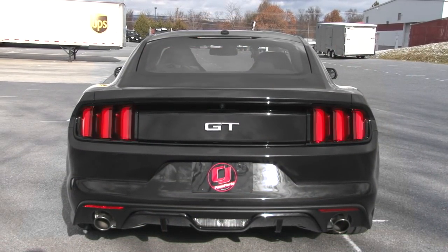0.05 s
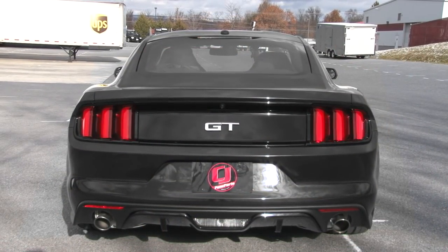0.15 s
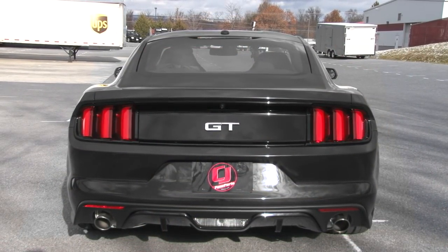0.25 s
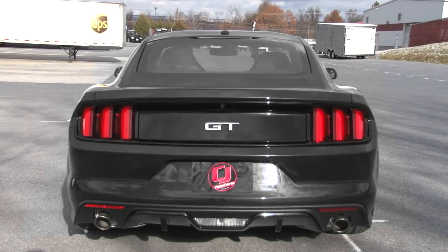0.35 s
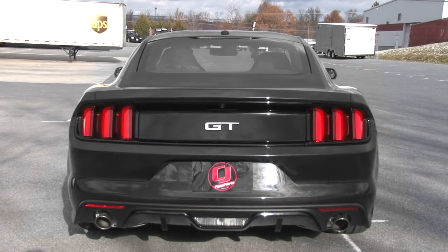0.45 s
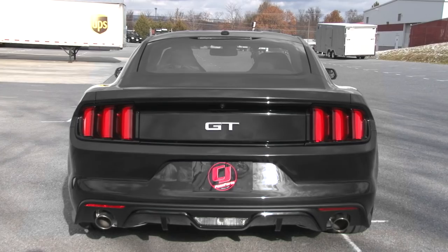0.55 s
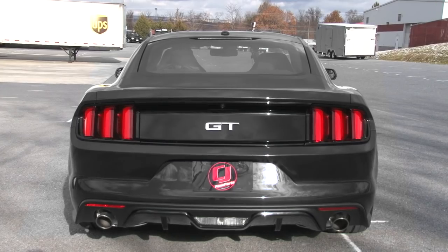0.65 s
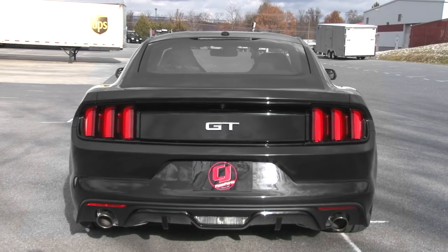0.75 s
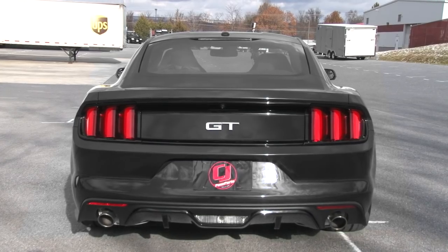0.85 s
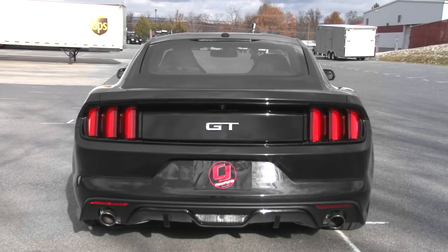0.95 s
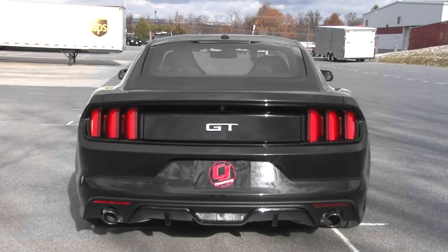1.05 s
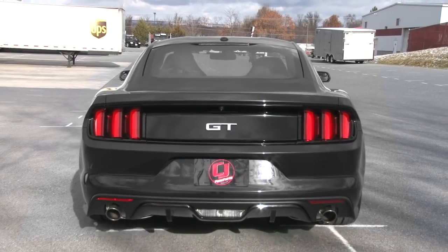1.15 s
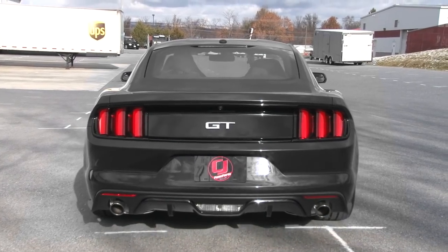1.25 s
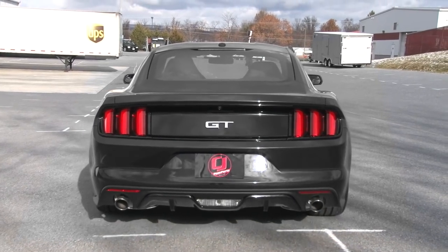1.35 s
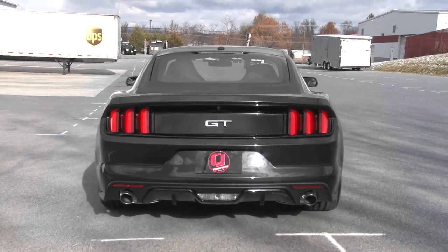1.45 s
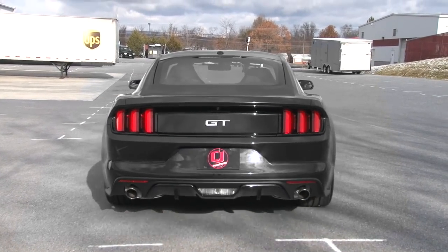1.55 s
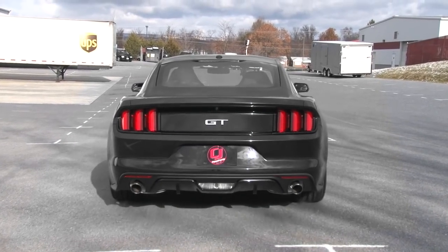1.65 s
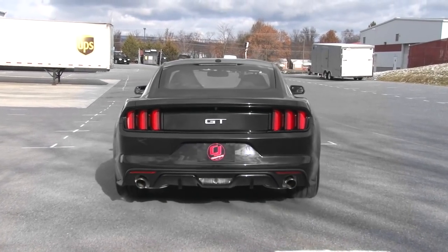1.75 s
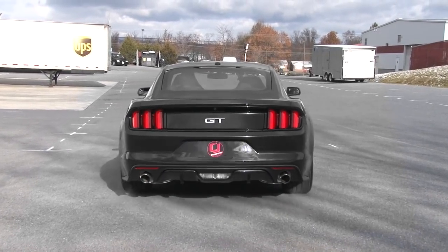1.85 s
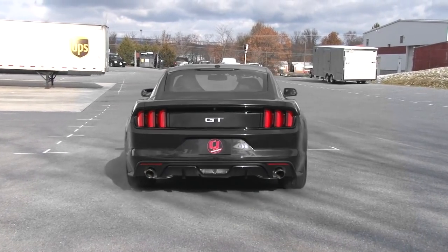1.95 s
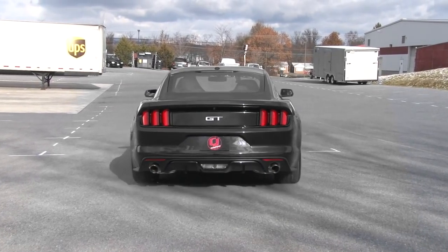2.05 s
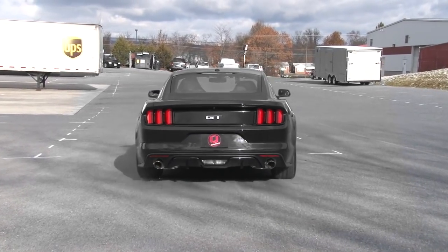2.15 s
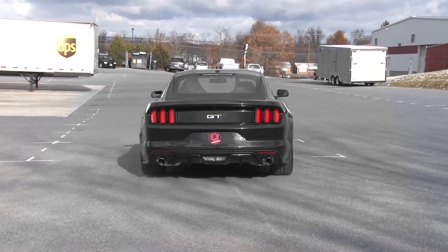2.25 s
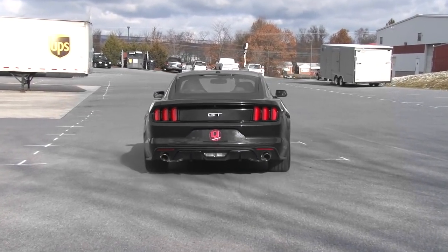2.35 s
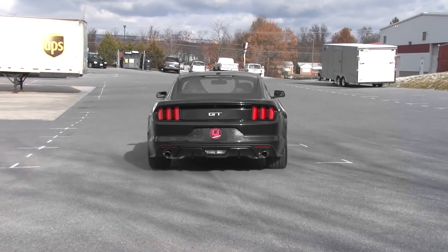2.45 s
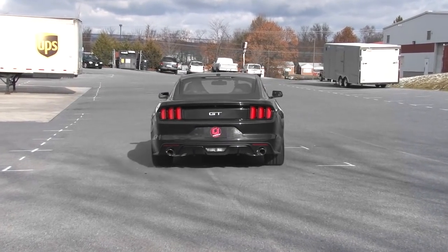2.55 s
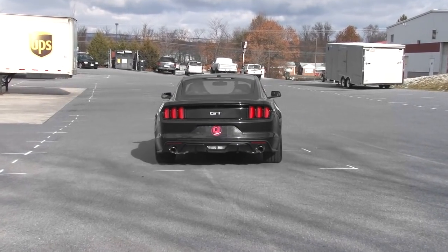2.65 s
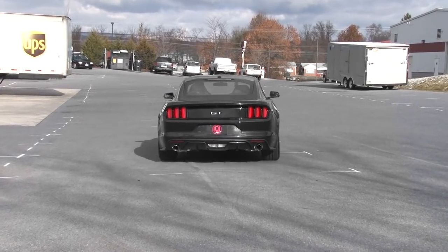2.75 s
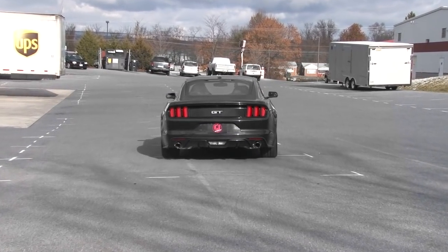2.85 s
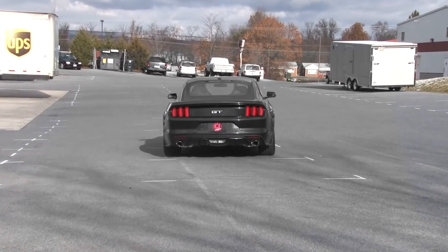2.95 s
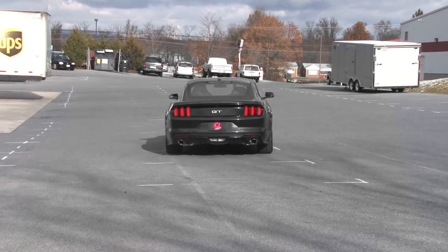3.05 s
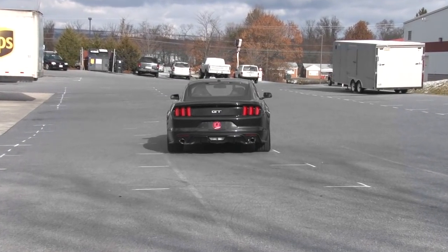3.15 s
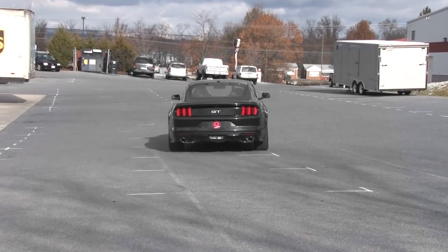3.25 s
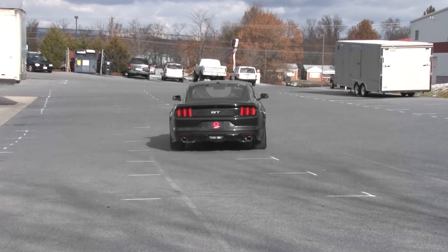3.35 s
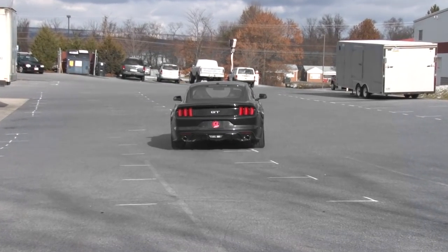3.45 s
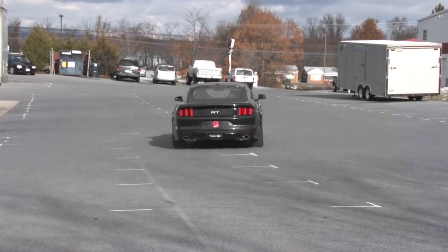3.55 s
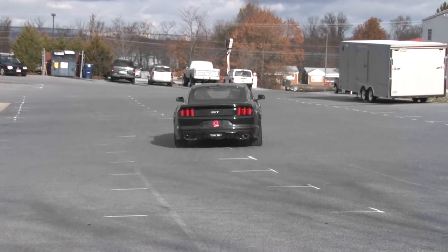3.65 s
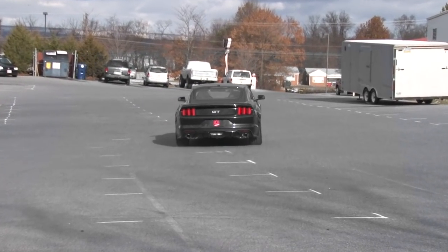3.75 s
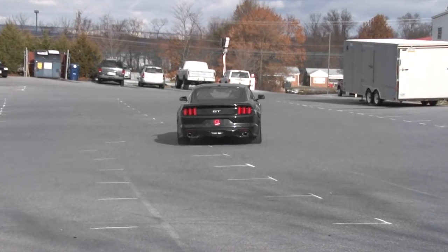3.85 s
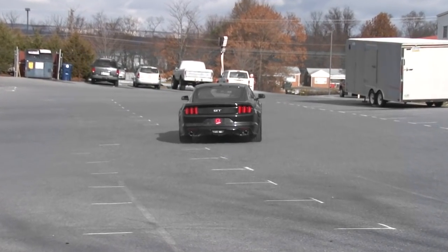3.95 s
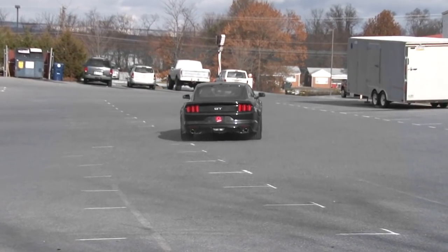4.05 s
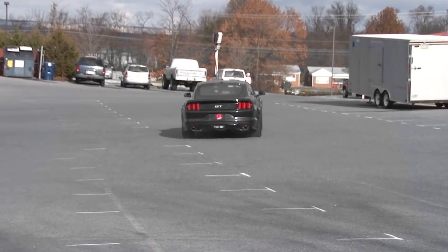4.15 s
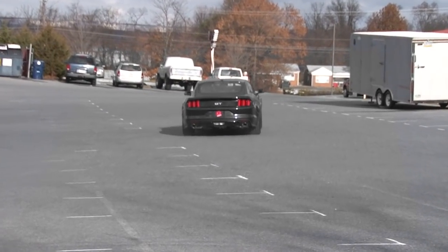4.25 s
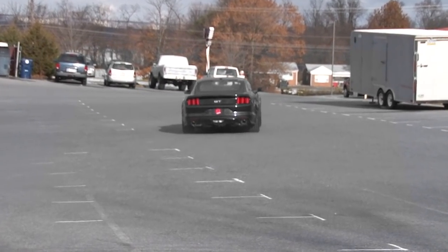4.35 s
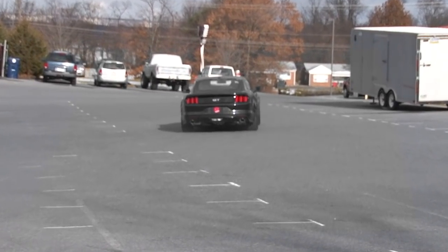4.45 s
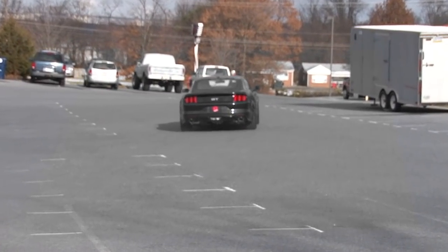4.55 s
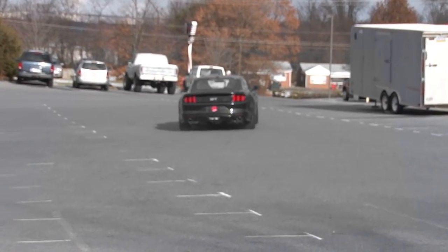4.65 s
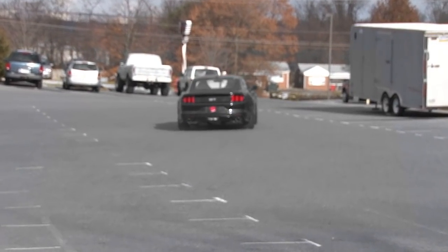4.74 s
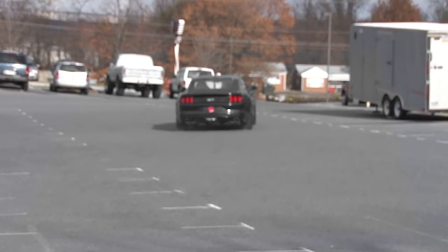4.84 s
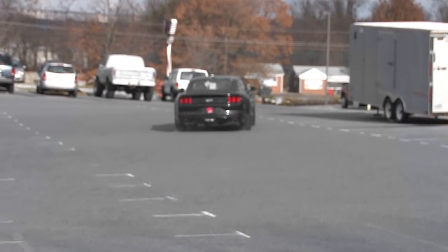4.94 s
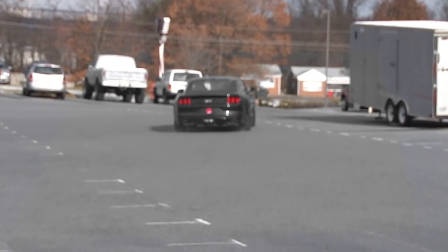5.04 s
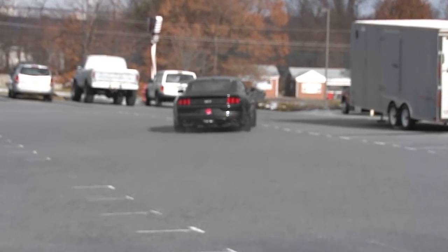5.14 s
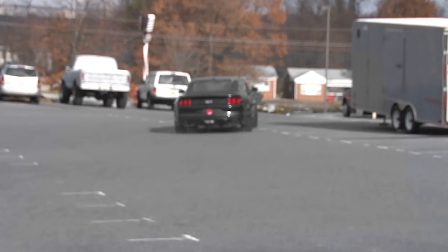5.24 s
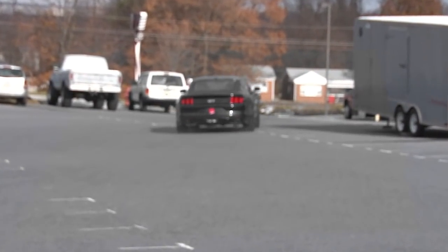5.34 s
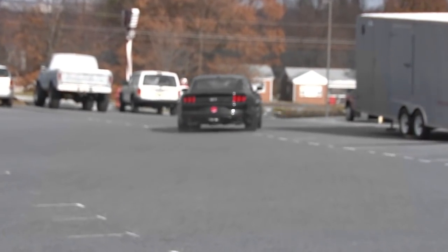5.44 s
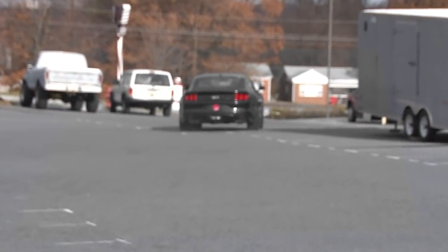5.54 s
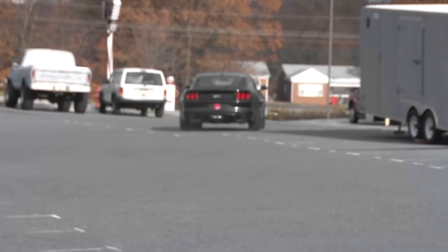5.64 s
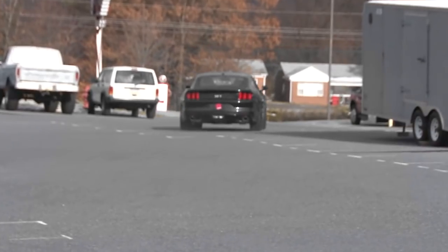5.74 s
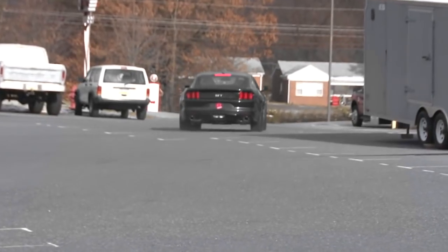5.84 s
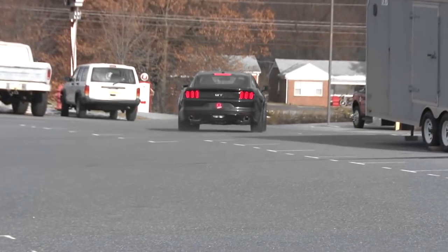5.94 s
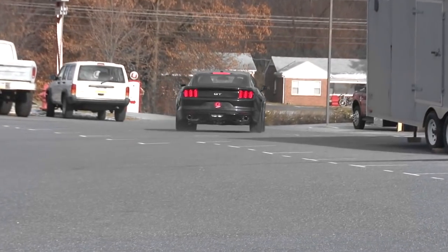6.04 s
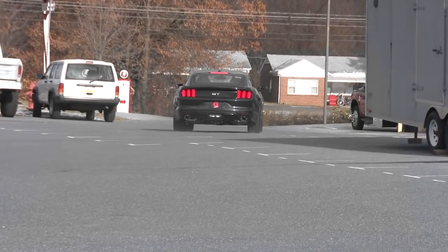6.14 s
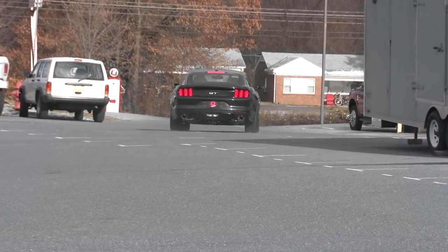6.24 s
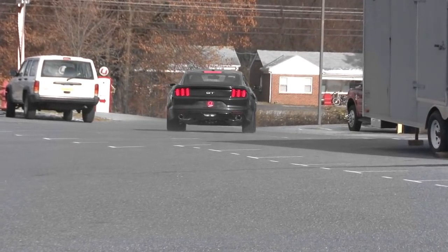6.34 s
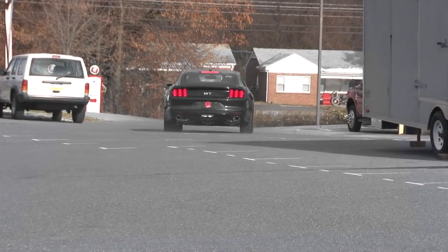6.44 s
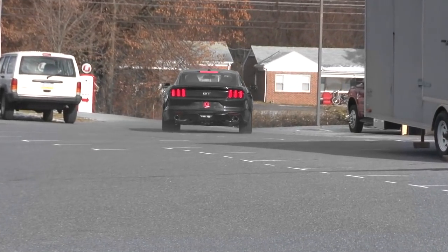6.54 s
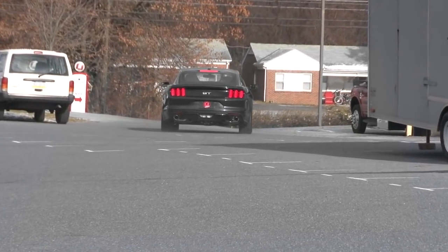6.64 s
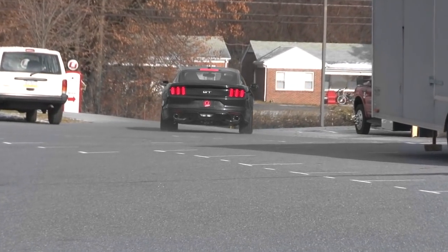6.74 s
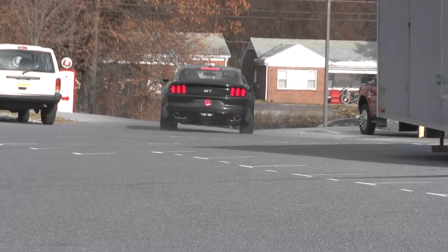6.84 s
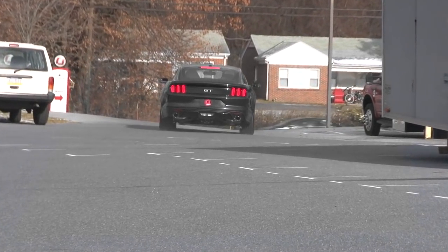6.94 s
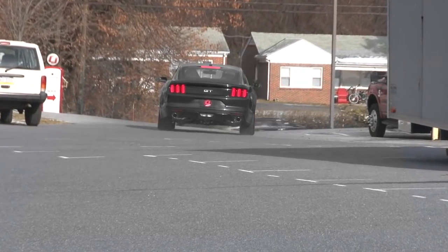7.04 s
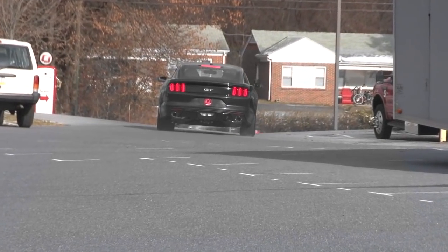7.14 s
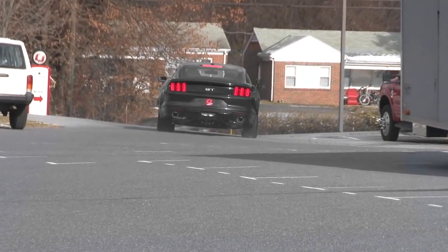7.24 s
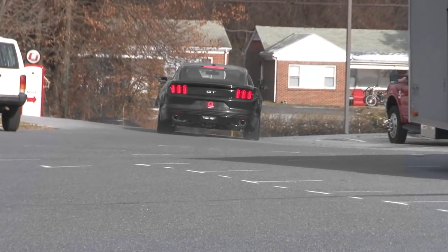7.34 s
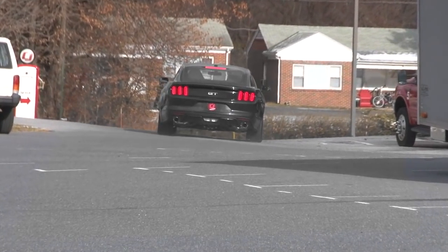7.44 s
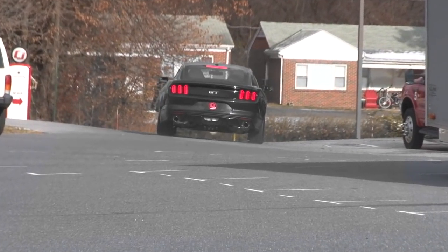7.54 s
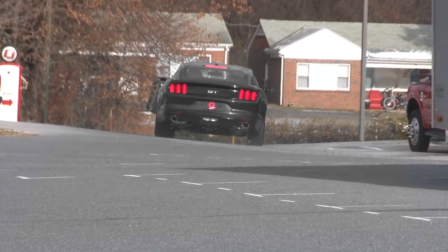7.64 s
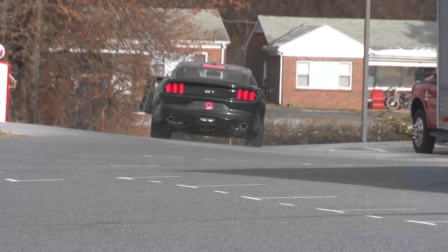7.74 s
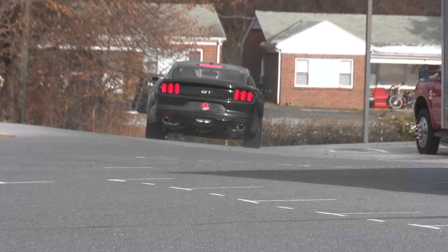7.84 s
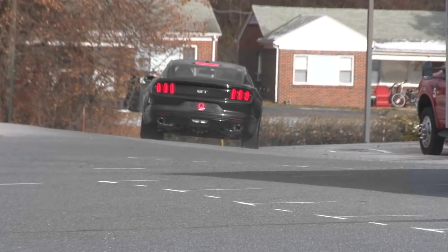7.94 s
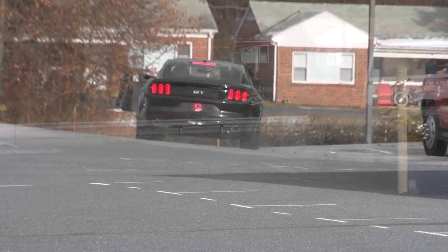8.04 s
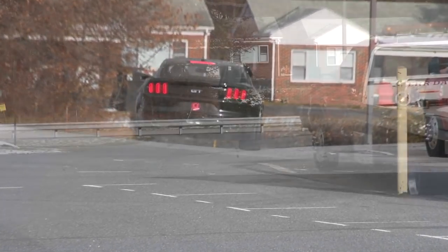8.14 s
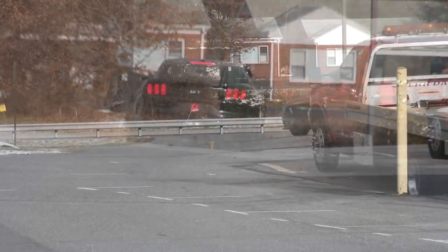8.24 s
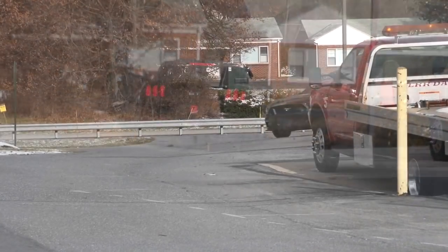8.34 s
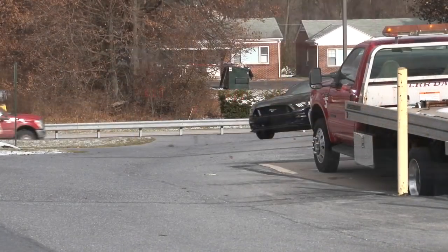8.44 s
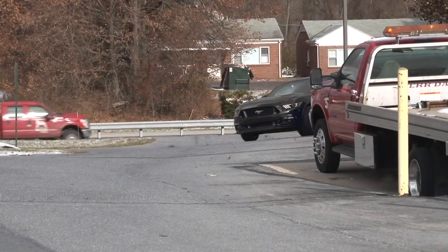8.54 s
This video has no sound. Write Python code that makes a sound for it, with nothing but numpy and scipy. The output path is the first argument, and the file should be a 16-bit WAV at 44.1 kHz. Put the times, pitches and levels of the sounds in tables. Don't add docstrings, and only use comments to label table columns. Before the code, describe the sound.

A V8 car burbles and pops, revs hard and launches with chirping tyres, roars through a gear change with another chirp, then fades off over paving.

```python
import sys
import numpy as np
from scipy import signal
from scipy.io import wavfile

SR = 44100
rng = np.random.default_rng(int(sys.argv[2]) if len(sys.argv) > 2 else 0)


def volts_from_db(level):
    exponent = np.asarray(level, float) / 20
    return 10 ** exponent


def wav_record(signal):
    frames = np.transpose(np.atleast_2d(signal))
    bounded = np.clip(frames, -1, 1)
    quanta = np.round(bounded * 32767).astype(np.int16)
    wavfile.write(sys.argv[1], SR, quanta)


N = 378798
T = np.arange(N) / SR

# (frequency [Hz], density [dB per Hz])
WIND_COLOUR = [(20, -5), (35, -8), (55, -2), (80, -6.5), (130, -19), (300, -19.5)]
# (time [s], peak [dB], half length [s])
WIND_GUSTS = [(0.0, -30.5, 0.19), (0.586, -25.5, 0.061), (1.965, -28, 0.02), (2.893, -48, 0.17),
              (3.664, -42, 0.14), (4.572, -46, .12), (5.55, -43, 0.25), (5.997, -41, 0.068),
              (6.604, -41.5, 0.42), (7.143, -42, 0.067), (7.333, -39, 0.18), (7.85, -36, 0.25),
              (8.223, -36.5, 0.16)]
BREEZE_DB = -46.5

# (frequency [Hz], density [dB per Hz])
ROAR_COLOUR = [(53, -47), (90, -6.5), (165, -2), (213, -3.5), (350, -6), (374, -1), (495, -4.5),
               (655, -2.5), (905, -9), (1080, -7.5), (1880, -21.5), (5660, -44.5), (15600, -164)]
# (time [s], roar level [dB])
ROAR_LEVEL = [(.7, -45.5), (1.0, -36), (2.1, -36), (2.6, -34.5), (3.7, -29), (5.3, -27.5), (6.2, -30),
              (6.8, -34), (7.3, -33), (8.15, -34.5), (8.59, -44)]
# (frequency [Hz], width [Hz], level [dB])
GROOVE_MODES = [(890, 120, -5), (1700, 600, -12)]
HUM_S, HUM_HALF_S, HUM_DB = 7.3, .5, 6

# (frequency [Hz], level [dB rms])
LATE_ENGINE = [(93, -64), (115.5, -35), (138.5, -35), (184, -35.5), (229.5, -37.5), (298, -35.5)]

# (time [s], peak [dB])
GRAVEL_CRUNCHES = [(5.2, -56), (5.697, -55), (6.05, -56), (6.32, -56), (6.51, -58), (7.232, -60.5),
                   (7.51, -65), (7.6, -63), (7.826, -56.5), (7.884, -63.5), (7.976, -61)]
# (frequency [Hz], width [Hz], level [dB])
CRUNCH_MODES = [(3980, 1600, 10.0), (11000, 7000, -26)]
CRUNCH_S = 0.0064

# (time [s], peak [dB], frequency [Hz])
STONES = [(0.5617, -58, 11500), (1.6497, -43, 9200), (1.782, -31, 13700), (1.8248, -45, 9000),
          (1.9051, -42, 12300), (1.9296, -42, 10200), (2.1157, -54, 9310), (2.1526, -52, 12200),
          (2.2055, -42, 12000), (2.2818, -50, 10600), (2.3102, -60, 11500), (2.3416, -52, 12200),
          (2.387, -45, 11600), (2.4449, -38, 14900), (2.5083, -42, 14600), (2.5447, -47, 11800),
          (2.604, -51, 11000), (2.6594, -48, 13400), (2.7028, -43, 11300), (2.8305, -49, 12000),
          (2.9847, -56, 10450), (3.3074, -52, 12000), (3.3568, -45, 12200), (3.4511, -36, 11400),
          (3.4965, -41, 12800), (3.5793, -49, 10040), (3.7953, -47, 10200), (4.0607, -38, 11400),
          (4.164, -44, 12900), (4.1939, -45, 12300), (4.263, -40, 11500), (4.3107, -42, 11200),
          (4.3865, -43, 9670), (4.4244, -51, 12100), (4.4653, -54, 9100), (4.4923, -41, 13300),
          (4.5516, -44, 10600), (4.615, -57, 10400), (4.6434, -54, 9030), (4.6878, -46, 10300),
          (4.7462, -47, 10000), (4.805, -38, 12500), (4.8649, -49, 10200), (5.061, -53, 9010),
          (5.1458, -61, 9700), (5.2001, -54, 9770), (5.3448, -58, 11600), (5.697, -56, 11000),
          (5.9026, -63, 9810), (5.9824, -63, 9820), (6.1859, -64, 12200), (6.2388, -63, 10900),
          (6.4014, -48, 10300), (6.4648, -57, 13400), (6.8299, -55, 10800), (7.5548, -63, 11000),
          (7.7908, -58, 11300), (7.8232, -67, 9000)]
# (time [s], level [dB])
FINE_GRIT_LEVEL = [(1.5, -90), (2, -50), (4.9, -50), (6.5, -63), (8.1, -68), (8.3, -80)]
# (frequency [Hz], width [Hz], level [dB])
FINE_GRIT_MODES = [(12500, 1800, 0.1), (6000, 5000, -5)]
BOUNCE_S, BOUNCE_DB, TICK_S = .012, -10, .00035

# (delay [s], level [dB])
YARD_ECHOES = [(0.013, -14.5), (0.049, -18), (.093, -38), (.16, -25)]

# (start [s], length [s], level [dB], brightness [dB])
TYRE_HOPS = [(1.64, 0.062, -41, 13), (1.69, 0.11, -22, -2.5), (1.816, 0.07, -24, 0.5),
             (1.929, 0.077, -29.5, 3.5), (2.039, 0.044, -29, -1), (2.104, 0.11, -32.5, -1),
             (4.857, 0.081, -46.5, 3), (4.918, 0.1, -30, -10), (5.041, 0.081, -30, -21),
             (5.154, 0.094, -34.5, -7.5), (5.269, 0.084, -39.5, -5.5)]
# (frequency [Hz], density [dB per Hz])
SCRUB_COLOUR = [(500, -13), (750, -5), (950, -2), (1400, -1), (1900, -5), (2400, -14), (3800, -18),
                (4700, -30), (8000, -41), (15600, -46)]
# (frequency [Hz], width [Hz], level [dB])
SQUEAL_MODES = [(745, 97, -5), (920, 37, 23), (1190, 48, 20.5), (1490, 31, -16), (1715, 110, 15.5),
                (1970, 80, -30)]
NEAR_EDGE, FAR_EDGE = .65, 1.0
FAR_S, FAR_CUT_HZ = 4, 5200
# (time [s], peak [dB], frequency [Hz])
TREAD_SNATCHES = [(1.652, -16, 853), (1.665, -33, 2650), (1.709, -16, 1430), (1.727, -13, 950),
                  (1.747, -21, 1500), (1.76, -14, 970), (1.829, -8, 1440), (1.833, -14, 885),
                  (1.942, -31, 1300), (1.951, -13, 960), (1.978, -20, 1530), (2.065, -19, 784),
                  (2.119, -20.5, 1740), (2.169, -31, 1206), (4.957, -22.5, 1310), (5.07, -25, 1220),
                  (5.193, -22, 1030)]
SNATCH_S = 0.0043

# (time [s], level [dB])
VALVE_LEVEL = [(0, -69), (1.2, -57.5), (2.5, -61.5), (4.2, -59.5), (5.5, -69.5), (6.5, -105)]
# (frequency [Hz], width [Hz], level [dB])
VALVE_MODES = [(6440, 380, 6.0), (8900, 2900, -6.0), (4400, 1600, 8.0), (12000, 6000, -2.0)]

# (time [s], pulse peak [dB], crack peak [dB])
TAILPIPE_POPS = [(.035, -50, -49), (.432, -26, -60), (.447, -24, -58), (.46, -20, -58), (.475, -21, -60),
                 (.492, -15, -52), (.56, -14, -52), (.57, -16, -42), (.587, -20, -56), (.604, -18, -52),
                 (.625, -25, -60), (.65, -25, -56)]
# (frequency [Hz], width [Hz], level [dB])
THUMP_MODES = [(70, 40, -4), (125, 50, -1), (205, 45, -1)]
# (frequency [Hz], width [Hz], level [dB])
CRACK_MODES = [(1280, 300, 3), (2400, 900, -15), (7000, 9000, -33)]
POP_LEAD_S = .005

# (time [s], cycle rate [cycles per s])
ENGINE_SPEED = [(.55, 9.3), (.85, 16.1), (1.07, 21.9), (1.42, 22.4), (1.75, 17.55), (2.0, 20.06),
                (2.38, 19.64), (2.6, 24.14), (2.85, 26.9), (3.9, 43.1), (4.33, 48.29), (4.42, 45.55),
                (4.78, 43.2), (4.97, 37.4), (5.2, 39.31), (5.55, 37.1), (5.8, 38.73), (6.3, 36.6)]
# (time [s], exhaust level [dB], throttle [0-1])
DRIVER_FOOT = [(0.0, -42.5, .1), (.32, -38.5, 0.1), (.55, -36, 0), (0.678, -31.5, 0.15), (.79, -20, 0.44),
               (.98, -20.5, 0.17), (1.5, -20.5, 0.7), (1.75, -21, 0), (2.35, -26, 0), (2.55, -23, 1),
               (3.92, -21, 0.9), (4.39, -26.5, 0), (4.44, -36, 0.02), (4.76, -29.5, 0), (4.8, -39.5, 0.3),
               (4.88, -24, 0.94), (5.81, -26, 0.66), (6.03, -40, 0.4)]
# (multiple of cycle rate, launch [dB], full load [dB], top of first gear [dB], second gear [dB])
FIRING_ORDERS = [(1, -18, -12, 0, 0), (2, 3, 12, -4, 4), (3, 5, -3, -8, -10), (4, 4, -3, -3, -8),
                 (5, 3, -4, -6, -7), (6, 6, 3, 4, 1), (7, 6, 3, -4, 1), (8, 15, 7, 6, 0), (9, 1, -2, 6, 5),
                 (10, 9, -1, 1, -1), (11, 1, 0, 5, 0), (12, -4, -3, 1, -2), (13, 5, -2, 3, 5),
                 (14, 4, 6, 4, 4), (15, 3, 6, -3, -1), (16, 5, 1, 3, -1), (17, -3, 2, -4, -4),
                 (18, 1, -1, -8, 0), (19, -1, 1, 2, 3), (20, -4, -1, 5, 3), (21, -2, 2, -1, 1),
                 (22, 4, 1, 3, 0), (23, 4, -1, 3, 0), (24, -1, 1, -3, 1), (25, -9, -4, 2, 3),
                 (26, -6, 1, 0, 2), (27, -1, 0, 0, 4), (28, -6, -5, -1, 0), (29, -8, -2, -1, -1),
                 (30, -3, -1, 0, 0), (31, -3, -1, 0, 0), (32, -8, 0, 0, 0)]
# (time [s], firing pattern [0-3], banks out of step [0-1])
FIRING_STAGE = [
    (0, 0, 0),
    (2.2, 0, 0),
    (2.4, .15, 1),
    (2.8, 1, 1),
    (3.4, 1, 1),
    (3.7, 1.6, 1),
    (3.9, 2, 0),
    (4.78, 2, 0),
    (4.86, 3, 0),
]
# (strength [dB], lateness [firing gaps])
HEADER_PULSES = [
    [(-2, .17), (-20, -.15), (-11, 0), (-18, .05), (-7, -.03), (-4, -.04), (-8, .09), (-4, .08)],
    [(0, .07), (0, -.02), (-17, .28), (-10, -.32), (-6.5, .4), (-2.5, -.17), (-1, .03), (0, .13)],
    [(0, -.02), (-13, -.1), (-15, -.14), (-20, .4), (-3.5, 0), (0, .02), (-5, .29), (-7.5, -.04)],
]
PIPE_SWING = [1.5, 2.05, 3.5]
# (frequency [Hz], level [dB])
PIPE_COLOUR = [(50, -18), (90, -14), (140, 0), (185, -5), (235, -2), (290, -11), (345, -7), (405, -8),
               (470, -5), (530, -9), (600, -14), (720, -13), (900, -18), (1200, -26)]
# (frequency [Hz], width [Hz], level [dB])
PUFF_MODES = [(169, 79, -14), (251, 46, -2), (433, 115, 1), (497, 99, 0.5), (680, 210, -29.5)]
# (frequency [Hz], density [dB per Hz])
RASP_COLOUR = [(750, -36), (1050, -7), (1500, -11), (2200, -14.5), (2700, -16), (3100, -18), (3550, -12.5),
               (4100, -28), (5500, -29.5), (8000, -65), (12500, -29.5), (15600, -60)]
# (frequency [Hz], width [Hz], level [dB])
CHAMBER_MODES = [(1204, 310, -7.5), (1710, 40, -12), (2700, 110, -2), (3520, 100, -1.5)]

COAST_HZ_PER_S, CRAWL_HZ = 8.4, 23
FADE_DB_PER_S = 19
ROUGH_SHUT_DB, ROUGH_OPEN_DB = -9, -21
DULL_DB_PER_OCTAVE = 3.5
BOOM_HZ, BOOM_WIDTH_HZ, BOOM_DB = 228, 30, 9
START_M, MOVES_S, PULL_M_PER_S2, BRAKES_S = 5.93, 0.75, 2.7, 6.1
RASP_DB, RASP_DB_PER_HZ, RASP_THROTTLE_DB = -63, 0.7161, 1
WHISTLE_FULL_HZ = 42
SPREAD = .08
SINGS_HZ = 19


def rms_one(x):
    return x / np.sqrt(np.mean(x ** 2) + 1e-20)


def in_time(rows):
    s, *columns = np.transpose(rows)
    return [np.interp(T, s, column) for column in columns]


def at_hz(points, hz):
    point_hz, db = np.transpose(points)
    return np.interp(np.log(hz), np.log(point_hz), db)


def after(s):
    return np.maximum(T - s, 0)


def bell(x, centre, half):
    return np.exp(-((x - centre) / half) ** 2)


def low_pass(x, hz, order=2):
    return signal.sosfilt(signal.butter(order, hz, fs=SR, output="sos"), x)


def band_pass(x, low, high):
    return signal.sosfilt(signal.butter(2, [low, high], "band", fs=SR, output="sos"), x)


def drift(rate):
    r = np.exp(-80 * np.pi * rate / SR)
    slow = signal.lfilter([1], [1, -2 * r, r * r], rng.standard_normal(N // 40 + 2002))[2000:]
    return np.interp(np.arange(N) / 40, np.arange(len(slow)), rms_one(slow))


def resonate(x, modes):
    out = 0
    for k, (hz, width, db) in enumerate(modes):
        r = np.exp(-np.pi * width / SR)
        poles = [1, -2 * r * np.cos(2 * np.pi * hz / SR), r * r]
        out = out + (-1) ** k * volts_from_db(db) * signal.lfilter([1 - r * r, 0, r * r - 1], poles, x)
    return out


def sing(x, modes):
    return sum(resonate(x, [mode]) for mode in modes)


def coloured(spectrum, patchy_db):
    out, together, white = 0, drift(0.94), rng.standard_normal((2, N))
    lowest, highest = spectrum[0][0], spectrum[-1][0]
    edges = np.geomspace(lowest, highest, round(3 * np.log2(highest / lowest)))
    for k, (low, high) in enumerate(zip(edges, edges[1:])):
        band = band_pass(white[k % 2], low, high)
        flicker_db = patchy_db * (0.23 * together + drift(6.3))
        out = out + band * volts_from_db(at_hz(spectrum, np.sqrt(low * high)) + flicker_db)
    return rms_one(out)


def wind():
    gusts = sum(volts_from_db(db) * bell(T, s, half) for s, db, half in WIND_GUSTS)
    return (volts_from_db(BREEZE_DB) + gusts) * coloured(WIND_COLOUR, patchy_db=0.0)


def road_roar():
    level_db, = in_time(ROAR_LEVEL)
    hum = volts_from_db(HUM_DB * bell(T, HUM_S, HUM_HALF_S))
    roar = coloured(ROAR_COLOUR, patchy_db=1.36)
    return volts_from_db(level_db - 7.0) * (roar + hum * sing(roar, GROOVE_MODES))


def late_engine():
    swell = np.clip((T - 7.95) / 0.31, 0, 1)
    return swell * sum(volts_from_db(db - 7.5 + 3.6 * drift(7.4)) * np.sin(2 * np.pi * hz * T) for hz, db in LATE_ENGINE)


def crunches():
    shape = sum(volts_from_db(db) * (T > s) * np.exp(-after(s) / CRUNCH_S) for s, db in GRAVEL_CRUNCHES)
    return shape * rms_one(resonate(rng.standard_normal(N), CRUNCH_MODES))


def grit():
    out, t = np.zeros(N + 400), np.arange(400) / SR
    chances = rng.uniform(.9, 1.3, (len(STONES), 3))
    for (s, db, hz), (late, loss, pitch) in zip(STONES, chances):
        bounce = (s + BOUNCE_S * late, db + BOUNCE_DB * loss ** 3, min(hz * pitch, 15000))
        for at, tick_db, tick_hz in ((s, db, hz), bounce):
            start = round(at * SR)
            tick = np.exp(-t / TICK_S) * np.sin(2 * np.pi * tick_hz * t)
            out[start:start + 400] += volts_from_db(tick_db + 4) * tick
    rolling_db, = in_time(FINE_GRIT_LEVEL)
    struck = rng.random(N) < 35 / SR
    strength = volts_from_db(3.3 * np.minimum(rng.exponential(1, N), 3))
    clicks = struck * strength * rng.choice([-1, 1], N)
    return out[:N] + volts_from_db(rolling_db) * resonate(clicks + 1e-18, FINE_GRIT_MODES)


def yard(x):
    dull = signal.lfilter([.3], [1, -.7], x)
    return x + sum(volts_from_db(db) * np.pad(dull, (round(s * SR), 0))[:N] for s, db in YARD_ECHOES)


def tyre_hops():
    dull, bright = np.zeros(N), np.zeros(N)
    for s, length, db, bright_db in TYRE_HOPS:
        arch = np.sin(np.pi * np.clip((T - s) / length, 0, 1) ** 0.77)
        shape = np.clip(arch, 0, 1) ** (NEAR_EDGE if s < FAR_S else FAR_EDGE)
        dull += volts_from_db(db) * shape
        bright += volts_from_db(db + bright_db) * shape
    scrub = coloured(SCRUB_COLOUR, patchy_db=2.5) * volts_from_db(2.3 * drift(90))
    low = low_pass(scrub, 3000)
    squeal = rms_one(resonate(resonate(rng.standard_normal(N), SQUEAL_MODES), SQUEAL_MODES))
    squeal = squeal * volts_from_db(0.82 * drift(18))
    thud = rms_one(resonate(rng.standard_normal(N), [(98.6, 15, 0.1)]))
    high = scrub - low
    high = np.where(T < FAR_S, high, low_pass(high, FAR_CUT_HZ, order=4))
    return dull * (low + volts_from_db(-5) * squeal + volts_from_db(-10) * thud) + bright * high


def snatches():
    out, t = np.zeros(N + 2000), np.arange(2000) / SR
    shape = np.minimum(t / 0.0019, 1) * np.exp(-t / SNATCH_S)
    for s, db, hz in TREAD_SNATCHES:
        rough = resonate(rng.standard_normal(2000), [(1.3 * hz, 900, 3)])
        start = round(s * SR)
        out[start:start + 2000] += volts_from_db(db - 3) * shape * (np.sin(2 * np.pi * hz * t) + .3 * rough)
    return out[:N]


def valve_gear():
    level_db, = in_time(VALVE_LEVEL)
    return volts_from_db(level_db + 1.6 * drift(38)) * rms_one(resonate(rng.standard_normal(N), VALVE_MODES))


def pops():
    thumps, cracks = np.zeros(N), np.zeros(N)
    for s, db, crack_db in TAILPIPE_POPS:
        start = round((s - POP_LEAD_S) * SR)
        thumps[start] = volts_from_db(db)
        cracks[start] = volts_from_db(crack_db)
    thumps = low_pass(thumps + 1e-18, 450)
    crack = np.convolve(cracks, np.hanning(600))[:N] * rng.standard_normal(N)
    return 105 * resonate(thumps, THUMP_MODES) + 4 * resonate(crack, CRACK_MODES)


def order_phase(k, stage):
    db, late = np.moveaxis(np.array(HEADER_PULSES), -1, 0)
    pulses = np.sum(volts_from_db(db) * np.exp(-2j * np.pi * k * (np.arange(8) + late) / 8), axis=1)
    phase = np.unwrap(np.angle(pulses) + PIPE_SWING)
    return np.interp(stage, [0, 1, 2, 3], phase[[0, 1, 1, 2]])


def firing_orders(cycle_hz, turn, throttle):
    stage, apart = in_time(FIRING_STAGE)
    dull_db = DULL_DB_PER_OCTAVE * np.clip(1 - throttle / .85, 0, 1)
    sing_db = np.interp(stage, [0, 1], [15, 2]) * np.clip((cycle_hz - SINGS_HZ) / 3, .2, 1)
    upper_hz = np.interp(stage, [0, 1], [512, 488])
    boom_db = BOOM_DB * np.minimum(stage, 1) * (1 - throttle)
    tones, power = 0, 0
    for k, *pattern_db in FIRING_ORDERS:
        hz = k * cycle_hz
        db = np.interp(stage, range(len(pattern_db)), pattern_db) + at_hz(PIPE_COLOUR, hz)
        db = db + sing_db * bell(hz, 400, 14) + 4 * bell(hz, upper_hz, 20)
        db = db - dull_db * np.log2(np.maximum(hz / 250, 1))
        db = db + boom_db * bell(hz, BOOM_HZ, BOOM_WIDTH_HZ)
        height = volts_from_db(db)
        power = power + height ** 2 / 2
        smear = apart * np.angle(np.exp(-1j * np.pi * SPREAD * k * k))
        phase = k * turn + order_phase(k, stage) + smear + .2 * drift(1.5)
        tones = tones + height * volts_from_db(1.2 * drift(4)) * np.cos(phase)
    return tones / np.sqrt(power)


def turbulent_puffs(turn):
    gate = volts_from_db(-3.0 * np.sin(turn) + 4.3 * np.cos(8 * turn))
    return rms_one(band_pass(resonate(gate * rng.standard_normal(N), PUFF_MODES), 60, 900))


def gas_rasp(cycle_hz, turn, throttle):
    moving = after(MOVES_S) - after(BRAKES_S)
    distance_m = START_M + PULL_M_PER_S2 * moving ** 2 / 2
    level_db = RASP_DB + RASP_DB_PER_HZ * cycle_hz + RASP_THROTTLE_DB * throttle
    level_db = level_db - 20 * np.log10(distance_m / START_M)
    rasp = coloured(RASP_COLOUR, patchy_db=0.45)
    whistle = np.minimum(cycle_hz / WHISTLE_FULL_HZ, 1) ** 2 * throttle * sing(rasp, CHAMBER_MODES)
    return volts_from_db(level_db) * rms_one(volts_from_db(-1.5 * np.sin(turn)) * (rasp + whistle))


def exhaust():
    cycle_hz, = in_time(ENGINE_SPEED)
    coasting = after(ENGINE_SPEED[-1][0])
    coast_hz = np.maximum(cycle_hz - COAST_HZ_PER_S * coasting, CRAWL_HZ)
    cycle_hz = np.where(coasting > 0, coast_hz, cycle_hz)
    level_db, throttle = in_time(DRIVER_FOOT)
    level_db = level_db - FADE_DB_PER_S * after(DRIVER_FOOT[-1][0])
    throttle = np.clip(throttle, 0, 1)
    turn = 2 * np.pi * np.cumsum(cycle_hz * (1 + .002 * drift(9))) / SR
    rough_db = ROUGH_SHUT_DB + (ROUGH_OPEN_DB - ROUGH_SHUT_DB) * throttle
    body = firing_orders(cycle_hz, turn, throttle) + volts_from_db(rough_db) * turbulent_puffs(turn)
    return volts_from_db(level_db) * body + gas_rasp(cycle_hz, turn, throttle)


def scene():
    background = wind() + road_roar() + late_engine()
    ground = crunches() + grit()
    echoing = yard(tyre_hops() + snatches() + pops())
    return (background + ground + echoing + valve_gear() + exhaust())[None]


def top_cut(x):
    return signal.sosfilt(signal.butter(12, 15750, fs=SR, output="sos"), x)


def record(dry):
    mix = signal.sosfilt(signal.butter(5, 33, "high", fs=SR, output="sos"), dry)
    return top_cut(mix)


dry = scene()
out = record(dry)
wav_record(out)
```